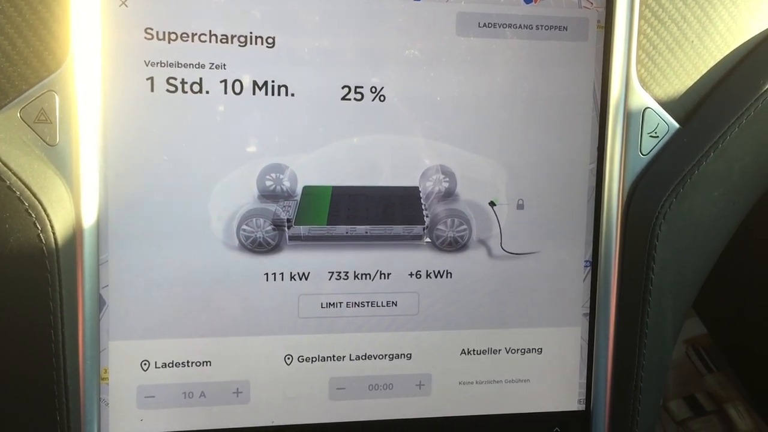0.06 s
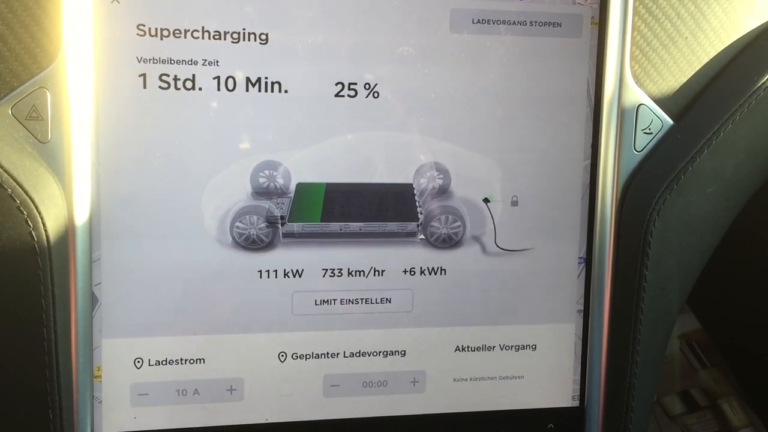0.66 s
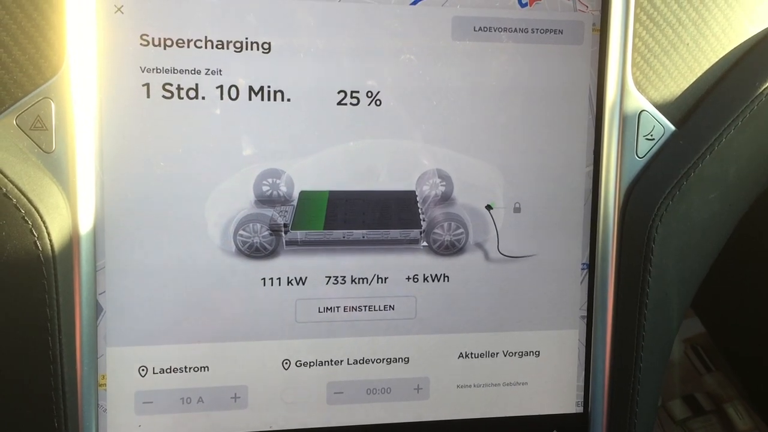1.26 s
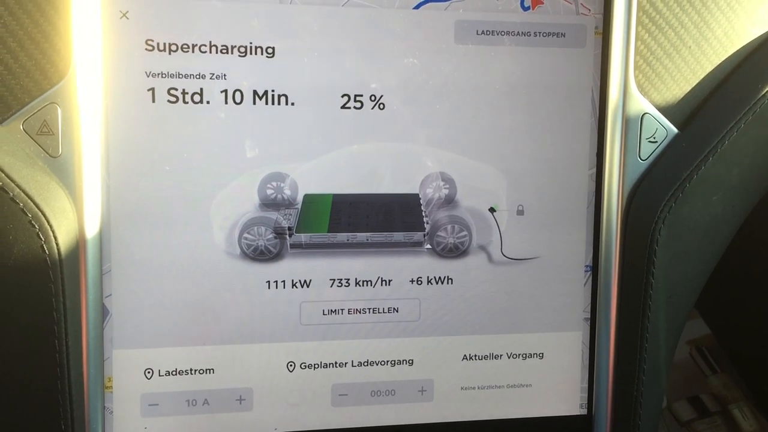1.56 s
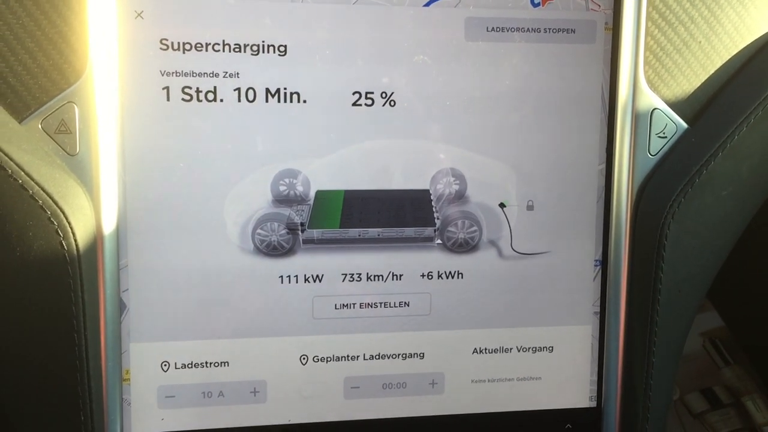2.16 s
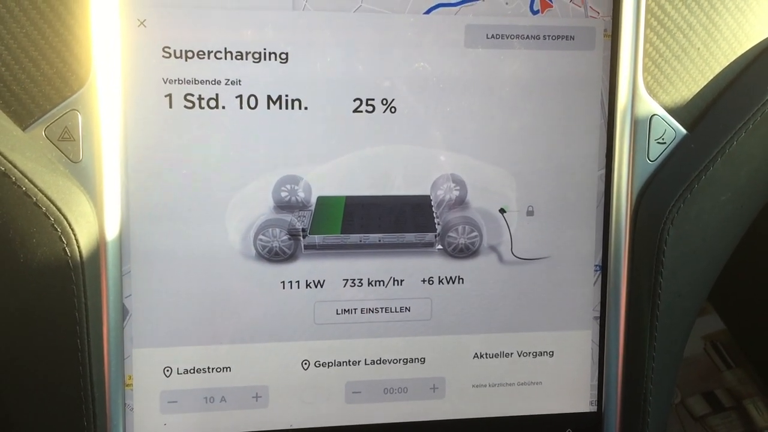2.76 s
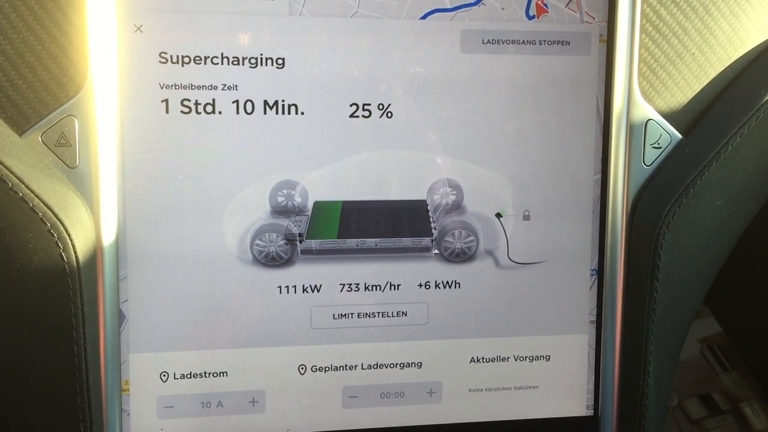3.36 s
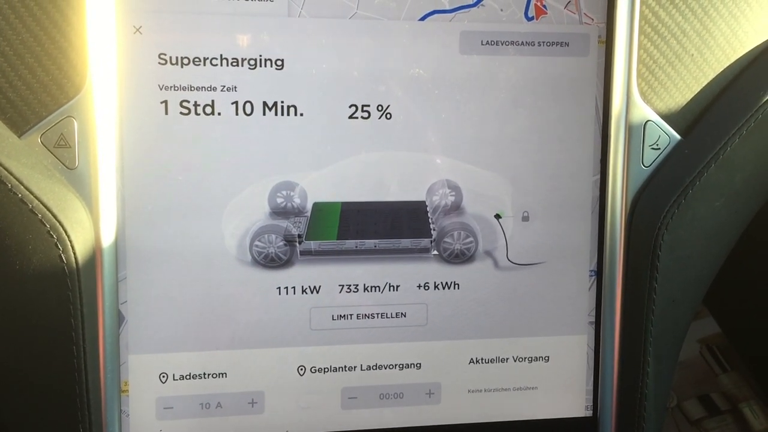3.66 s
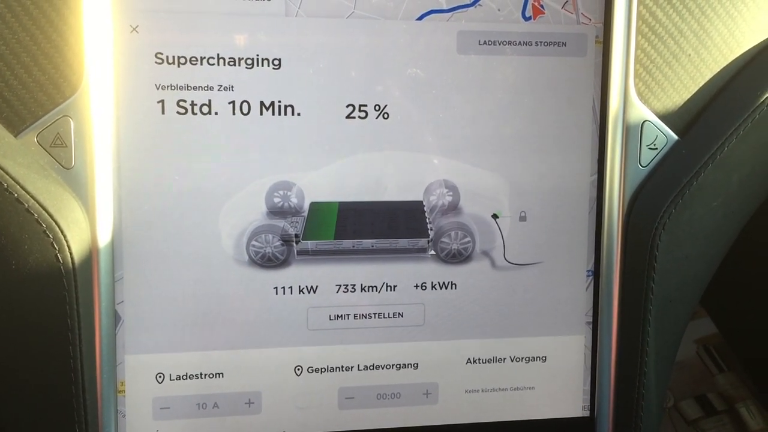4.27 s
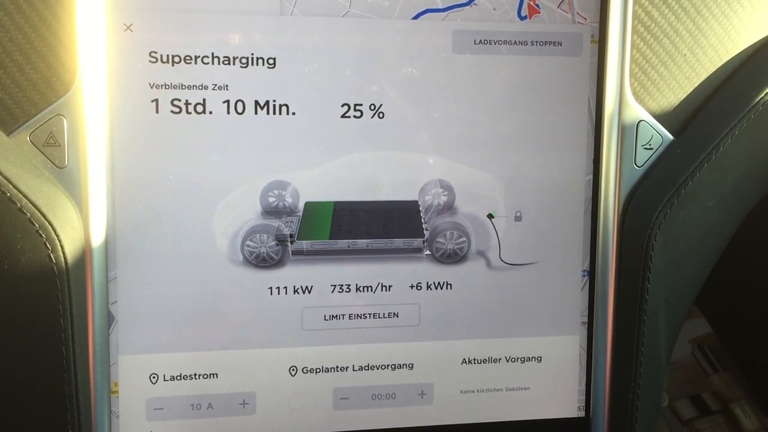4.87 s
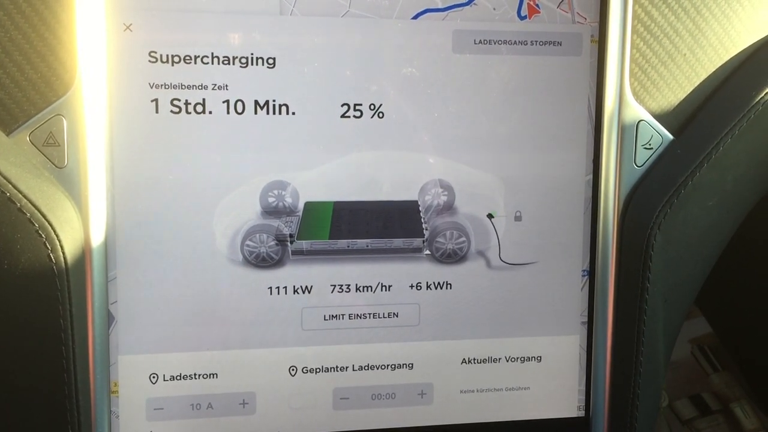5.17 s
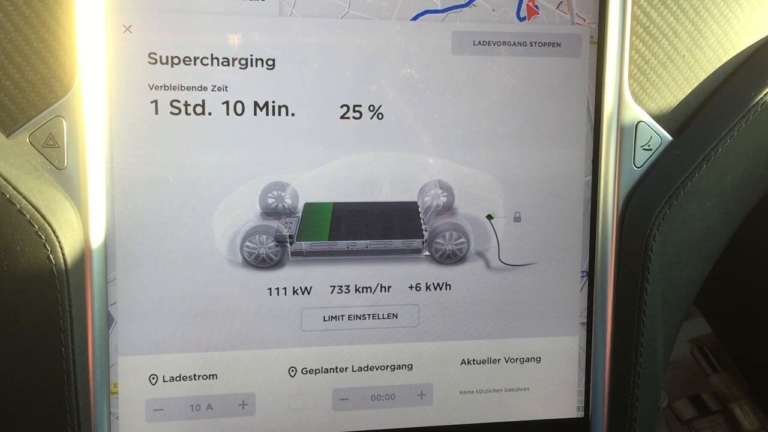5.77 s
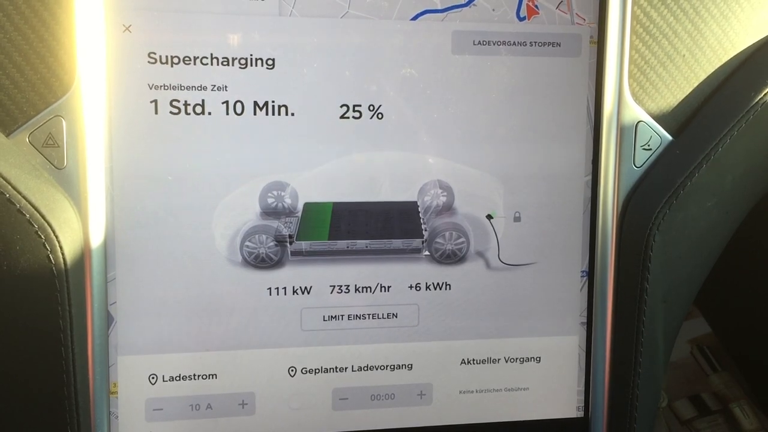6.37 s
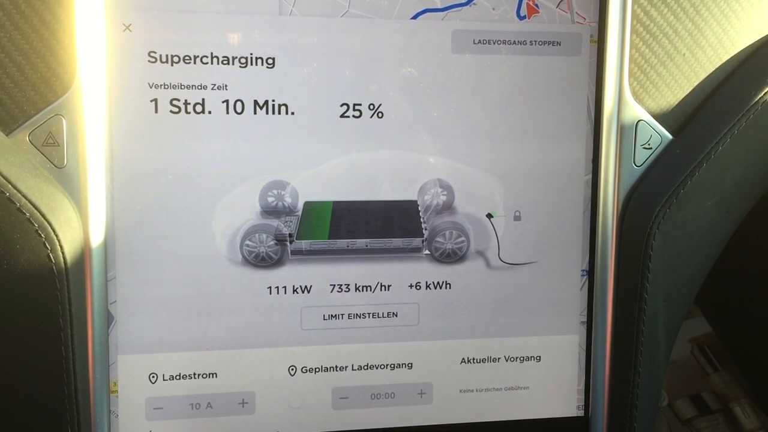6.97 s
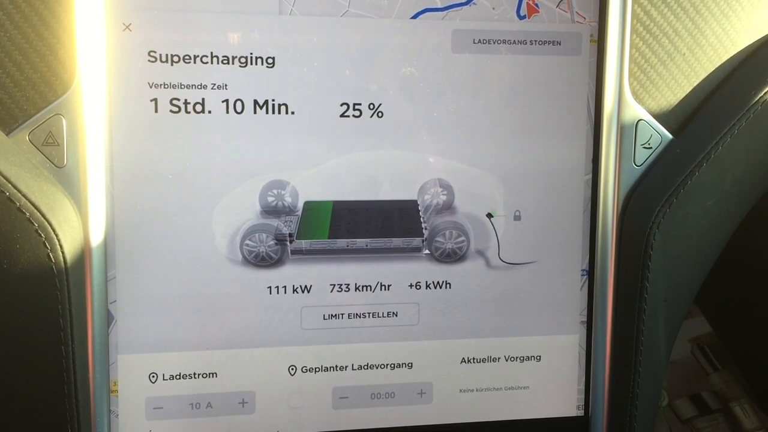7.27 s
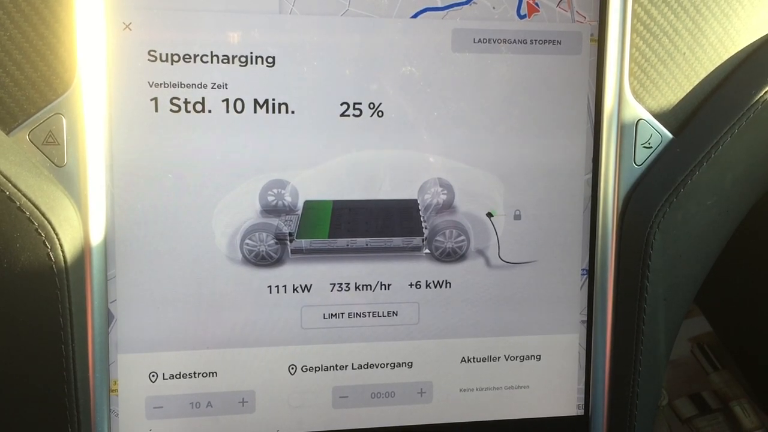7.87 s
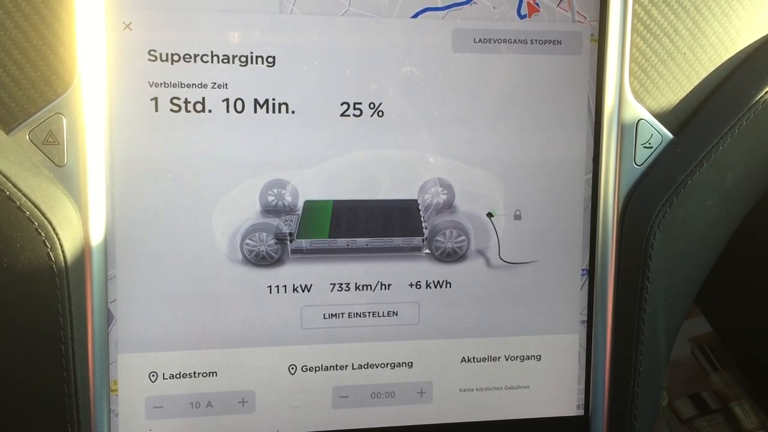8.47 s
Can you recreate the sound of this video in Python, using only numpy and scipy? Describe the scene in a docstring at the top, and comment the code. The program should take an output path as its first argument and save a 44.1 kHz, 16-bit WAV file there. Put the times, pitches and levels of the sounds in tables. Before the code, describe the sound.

Inside a closed electric car, a hard-running cooling fan makes an even, deep drone over a muffled rush of air.

```python
"""A steady cooling rotor drones in a parked electric car, heard inside the closed cabin.
The drone is deep, with a long row of faint overtones. The fan's air rushes through the body,
which passes mostly bass, and rings narrow cabin, duct and pipe resonances.
Thin whines waver over a faint hiss."""
import sys
import numpy as np
from scipy.fft import rfft, irfft, next_fast_len
from scipy.io import wavfile
from scipy.ndimage import map_coordinates

SR = 44100
rng = np.random.default_rng(int(sys.argv[2]) if len(sys.argv) > 2 else 0)


def bounce(signal):
    """Save signal as a 16-bit WAV file at the path given by the first command-line argument."""
    frames = np.transpose(np.atleast_2d(signal))
    limited = np.clip(frames, -1, 1)
    pcm = np.round(limited * 32767).astype(np.int16)
    wavfile.write(sys.argv[1], SR, pcm)


N = 384993

# Noise spectra. Each row: frequency in Hz, relative density in dB.
RUMBLE_SPECTRUM = [(15, -44), (26, -23), (38, -17.5), (42, -6), (55, -6), (75, -0.5), (98, -3),
                   (135, -10.5), (160, -16), (200, -30), (400, -69)]  # boom behind the body panels
RUSH_SPECTRUM = [(120, -25.5), (185, -4.5), (280, -0.5), (345, -2), (455, -9), (545, -4.5), (680, -15.5),
                 (1060, -25.5), (1400, -24), (1540, -27), (1680, -33), (1740, -27.5), (1850, -38.5),
                 (4000, -59.5)]
HOLLOW_SPECTRUM = [(600, -39.5), (690, -11.5), (725, -0.5), (770, 0), (820, -8.5), (865, -3), (910, -18.5),
                   (1000, -11), (1100, -43.5)]  # hollow middle of the rush
HISS_SPECTRUM = [(600, -20), (1900, 0), (2700, 1), (3700, -3), (4500, -3), (4900, -8.7), (5300, -5),
                 (6800, -4.5), (7600, -9), (9600, -8.5), (10400, -16.5), (11000, -12), (15700, -13.5)]
SHEEN_SPECTRUM = [(10000, -41), (12000, -1), (15700, -1)]  # topmost hiss
# Air flow: builds, holds, eases off. Each row: time in seconds, strength in dB.
AIR_FLOW = [(0, -4.5), (.8, 0), (5.9, -0.5), (6.9, -5), (8.7, -5.5)]
# Cabin, duct and pipe resonances. Each row: centre in Hz, width in Hz, rms level in dB.
STEADY_RESONANCES = [(41.3, 2.2, -54.5), (198, 5, -70), (283, 24, -58), (303, 11, -60), (2205, 30, -95),
                     (2977, 14, -94), (3390, 35, -93), (3480, 30, -96), (4156, 22, -96), (4428, 28, -98),
                     (5425, 18, -102), (6611, 25, -99), (6790, 130, -99), (7015, 20, -104),
                     (7125, 25, -104), (7295, 40, -104)]
# Resonances that flutter in bursts. Each row: centre in Hz, width in Hz, relative level in dB.
FLUTTER_RESONANCES = [(1272, 40, -85), (1491, 14, -82.5), (1600, 28, -80.5), (1631, 14, -82)]
# Lesser motor tones. Each row: frequency in Hz, rms level in dB.
MOTOR_TONES = [(173, -73.5), (837.5, -81.5)]
# Passing whines. Each row: peak time in seconds, half-width in seconds, pitch in Hz, peak rms in dB.
WHINE_SWELLS = [(3.2, .05, 6338, -89), (3.55, .4, 4428, -91), (4.2, 4, 6338, -92.5), (4.9, 1.2, 931, -81),
                (6.14, .07, 4156, -85.5), (6.2, .45, 4428, -89), (6.95, .1, 7300, -89.5),
                (8.63, .1, 4156, -88)]
# Rotor harmonics. Each row: multiple of the rotor rate, relative level in dB.
ROTOR_HARMONICS = [(1, -0.5), (2, -18.5), (3, -29.5), (4, -40.5), (5, -37.5), (6, -42), (7, -47.5),
                   (8, -47.5), (9, -47.5), (10, -47), (11, -46), (12, -56), (13, -56), (14, -56.5),
                   (15, -58), (16, -60.5), (17, -55.5), (18, -55), (20, -63), (21, -65.8), (24, -55),
                   (27, -60), (29, -68), (30, -56), (32, -67)]


def amp(db):
    """Decibels to gain."""
    return 10 ** (np.asarray(db) / 20)


def unit_rms(x):
    """Scale to rms 1."""
    return x / np.sqrt(np.mean(x ** 2) + 1e-20)


def wobble(rate_hz):
    """Smooth random curve, rate_hz knots a second."""
    knots = rng.standard_normal(1024)
    grid = np.arange(0, N + 64, 64)
    curve = map_coordinates(knots, [grid * rate_hz / SR], mode="wrap")
    return np.interp(np.arange(N), grid, curve)


def rise(centre_s, over_s):
    """Linear ramp from 0 to 1."""
    return np.clip((np.arange(N) / SR - centre_s) / over_s + .5, 0, 1)


def filtered(x, response):
    """Apply a gain given as a function of Hz."""
    size = next_fast_len(N + SR // 2)
    return irfft(rfft(x, size) * response(np.fft.rfftfreq(size, 1 / SR)), size)[:N]


def noise(spectrum):
    """Noise of rms 1, shaped on a log frequency axis."""
    points_hz, db = np.transpose(spectrum)
    gain = lambda hz: amp(np.interp(np.log(hz + 1), np.log(points_hz), db))
    return unit_rms(filtered(rng.standard_normal(N), gain))


def ringing(resonances):
    """Noise through steep-sided peaks, summed in power."""
    def gain(hz):
        power = 0
        for centre_hz, width_hz, db in resonances:
            peak = unit_rms(1 / (1 + ((hz - centre_hz) / (.75 * width_hz)) ** 2))
            power += (amp(db) * peak) ** 2
        return np.sqrt(power)
    return filtered(rng.standard_normal(N), gain)


def wavering_tone(hz, spread_hz, rate_hz):
    """Sine of rms 1 with wandering pitch."""
    return np.sqrt(2) * np.sin(2 * np.pi * np.cumsum(hz + spread_hz * wobble(rate_hz)) / SR)


def flow_db():
    """Air flow strength per sample."""
    return np.interp(np.arange(N) / SR, *np.transpose(AIR_FLOW))


def eddy_flicker(depth_db=4, rate_hz=26):
    """Gain of rms 1 that flickers as the eddies change."""
    return unit_rms(amp(depth_db * wobble(rate_hz)))


def sheen(level_db=-90.5):
    """A faint topmost hiss switches on halfway and stays."""
    return amp(level_db) * rise(centre_s=4.45, over_s=.065) * noise(SHEEN_SPECTRUM)


def fan_air(rumble_db=-48, rush_db=-55.5, hollow_db=-66, hiss_db=-75.5):
    """Fan turbulence: cabin boom, churning rush and even hiss."""
    rumble = amp(rumble_db) * noise(RUMBLE_SPECTRUM)
    churn_db = .4 * wobble(2) + wobble(12)
    rush = amp(rush_db + churn_db) * noise(RUSH_SPECTRUM)
    hollow = amp(hollow_db + flow_db() + 2 * wobble(12)) * noise(HOLLOW_SPECTRUM)
    hiss = amp(hiss_db) * noise(HISS_SPECTRUM)
    return rumble + rush + hollow + hiss


def ducts(waver_db=.5, full_flow_db=1.35, db_per_flow_db=.4):
    """The flow rings narrow resonances, each a fuzzy pitch; eddies make some flutter."""
    steady = amp(waver_db * wobble(4.4)) * ringing(STEADY_RESONANCES)
    bursts = amp(full_flow_db + db_per_flow_db * flow_db()) * eddy_flicker()
    return steady + bursts * ringing(FLUTTER_RESONANCES)


def motor_tones(waver_db=.7):
    """Faint, nearly steady motor tones."""
    return sum(amp(db + waver_db * wobble(2.1)) * wavering_tone(hz, spread_hz=.61, rate_hz=3.3)
               for hz, db in MOTOR_TONES)


def whines():
    """Thin tones swell, flicker in the eddies and fade."""
    t = np.arange(N) / SR
    sound = np.zeros(N)
    for peak_s, half_width_s, hz, db in WHINE_SWELLS:
        swell = amp(db) / (1 + ((t - peak_s) / half_width_s) ** 2)
        sound += swell * eddy_flicker() * wavering_tone(hz, spread_hz=.003 * hz, rate_hz=40)
    return sound


def rotor_drone(rotor_hz=143.2, drift_hz=.029, level_db=-36.5, step_db=.67,
                sway_rad=.12, flutter_db=.9, swell_db=1):
    """The rotor holds its speed: firm fundamental, overtones fluttering in the moving air."""
    turns = np.cumsum(rotor_hz + drift_hz * wobble(2)) / SR
    hum = np.zeros(N)
    for order, db in ROTOR_HARMONICS:
        looseness = 1 - 1 / order
        phase = 2 * np.pi * (order * turns + rng.random()) + looseness * sway_rad * wobble(7)
        waver_db = flutter_db * wobble(5) + swell_db * wobble(.8)
        hum += amp(db + looseness * waver_db) * np.sin(phase)
    gain = amp(level_db + step_db * rise(centre_s=4.7, over_s=1))
    return np.sqrt(2) * gain * hum


def scene():
    """Mono mix at the front seats."""
    return (rotor_drone() + fan_air() + sheen() + ducts() + motor_tones() + whines())[None]


def record(dry):
    """Brick-wall low-pass."""
    cutoff_hz = 15740
    return np.array([filtered(channel, lambda hz: hz < cutoff_hz) for channel in dry])


dry = scene()
out = record(dry)
bounce(out)
```